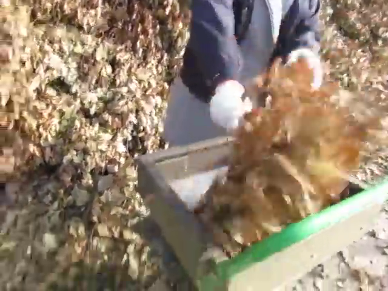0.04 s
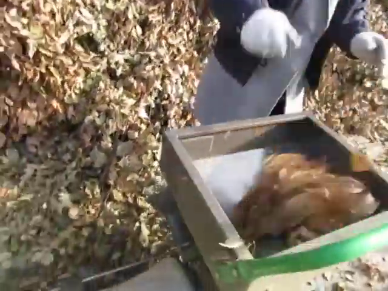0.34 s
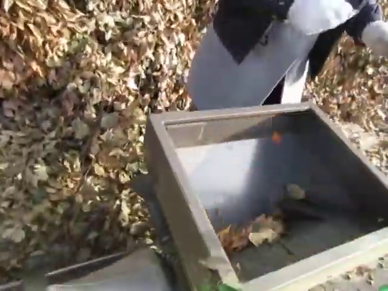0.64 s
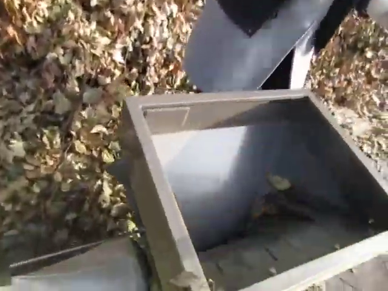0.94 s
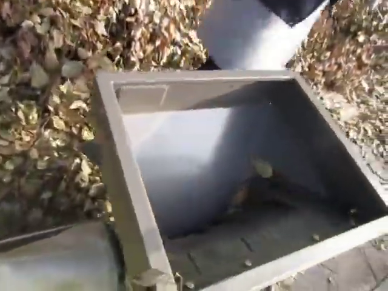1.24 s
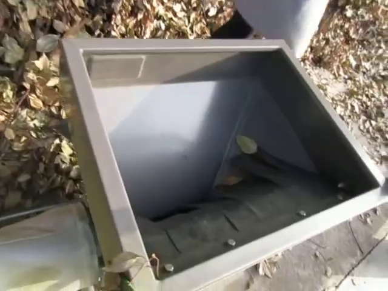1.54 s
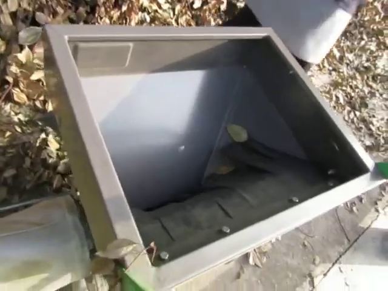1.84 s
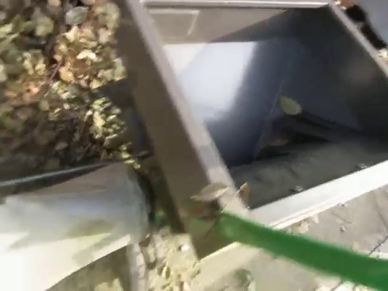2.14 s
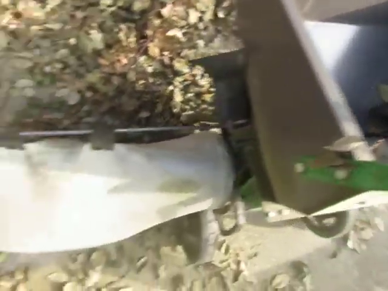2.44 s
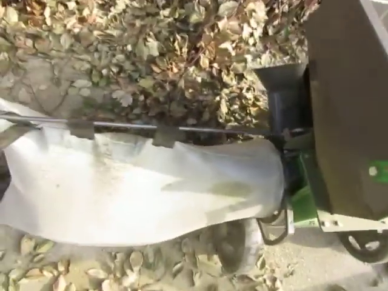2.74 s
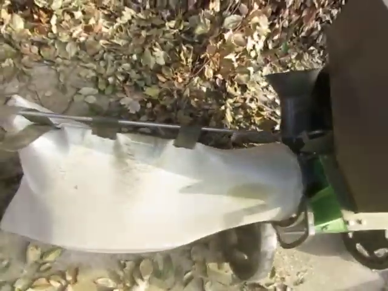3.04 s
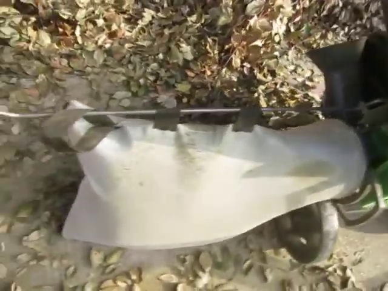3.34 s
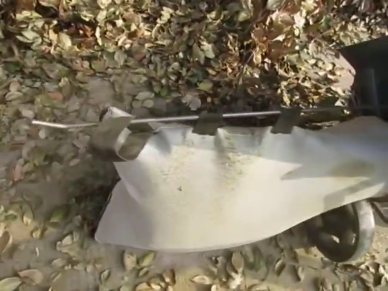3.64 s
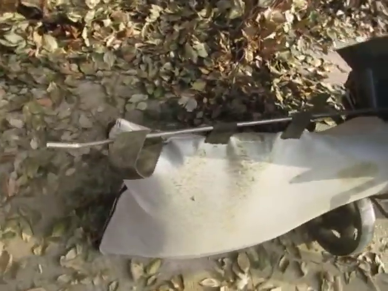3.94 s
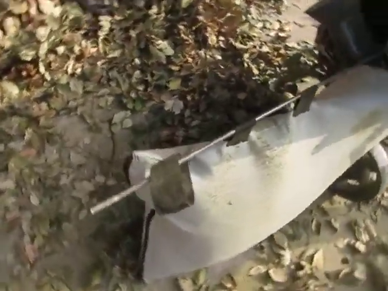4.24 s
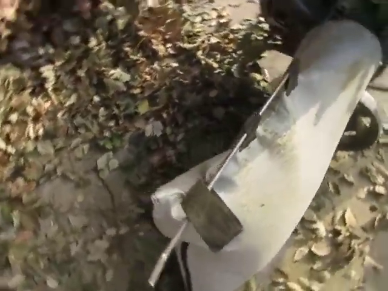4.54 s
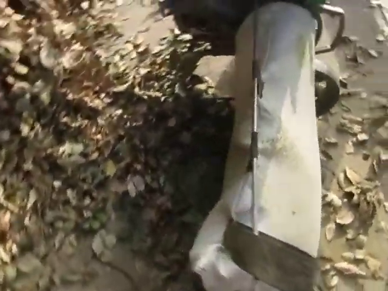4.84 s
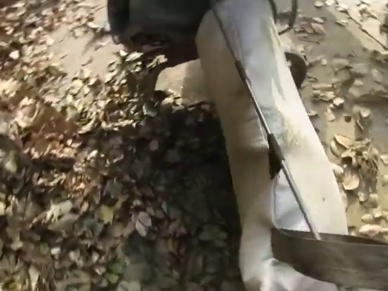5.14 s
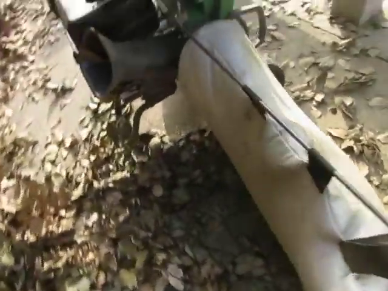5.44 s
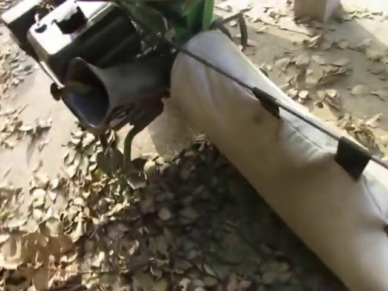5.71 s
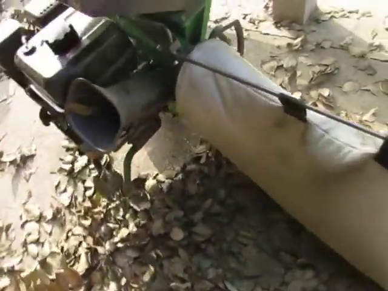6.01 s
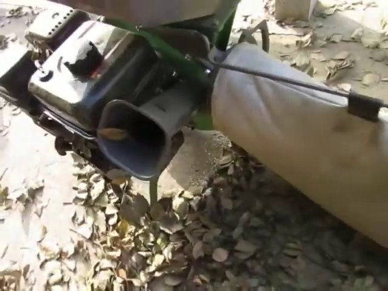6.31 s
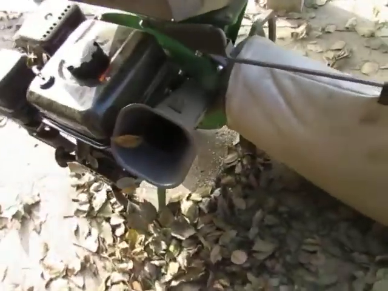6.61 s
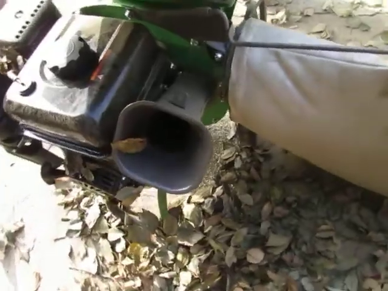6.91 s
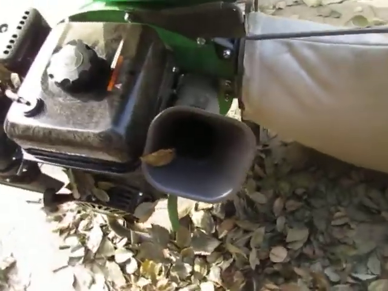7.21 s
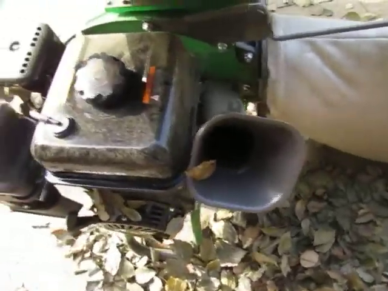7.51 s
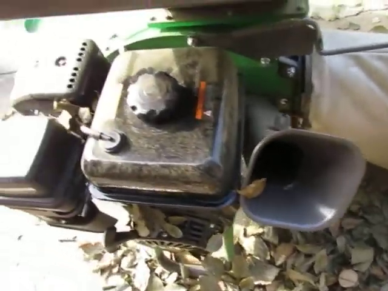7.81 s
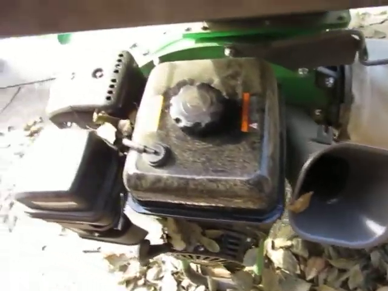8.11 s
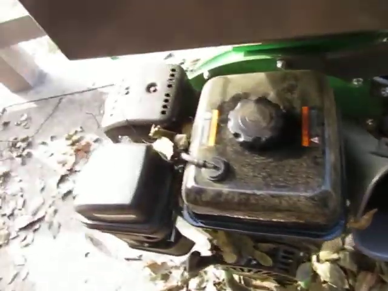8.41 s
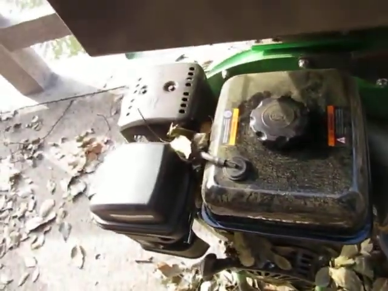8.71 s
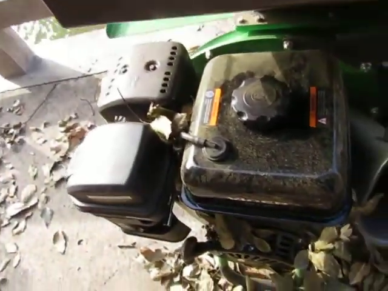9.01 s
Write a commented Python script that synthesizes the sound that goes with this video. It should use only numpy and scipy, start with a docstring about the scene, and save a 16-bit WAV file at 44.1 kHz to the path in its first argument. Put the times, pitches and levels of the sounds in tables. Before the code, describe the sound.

A petrol chipper shredder runs outdoors throughout, heard close up as a strong, steady drone over a throbbing exhaust and a low rush of air. From the start, dry leaves crunch loudly in the rotor and chips hiss into a cloth bag. The engine sags slightly in pitch until about 0.9 seconds and recovers by 1.5 seconds. Stalks ping against the ringing steel hopper during the first three seconds. The crunching eases after one second and keeps fading, with short hissing spurts of chips between two and six seconds, by which time the leaves have almost run out. As the microphone moves along the machine, the drone wavers in strength and its higher overtones come forward. The engine's metallic clatter recedes around three seconds, returns near five and is stronger from seven seconds until the end, at about nine seconds.

```python
"""Dry leaves crunch over the drone of a single-cylinder petrol chipper shredder running outdoors.
The armful sags the engine until the governor catches it; the rotor shatters the leaves, flings
them against the steel hopper and blows the chips hissing into a cloth bag. As the hopper empties
the microphone moves along the bag to the engine, so the rotor's overtones shift and the clatter grows."""
import sys
import numpy as np
from scipy import signal
from scipy.fft import rfft, irfft, next_fast_len
from scipy.io import wavfile
from scipy.ndimage import map_coordinates

SR = 44100
rng = np.random.default_rng(int(sys.argv[2]) if len(sys.argv) > 2 else 0)


def transcribe(u):
    """Save the signal u as a 16-bit wav file named by the first command-line argument.

    u: samples, shape (n,) or (channels, n), limited to [-1, 1]; the rate is SR.
    q: integer samples, one column per channel.
    """
    v = np.clip(np.atleast_2d(u).T, -1, 1)
    q = np.round(v * 32767).astype(np.int16)
    wavfile.write(sys.argv[1], SR, q)


N = 403956
TIME = np.arange(N) / SR

# the load drags the crankshaft down and the governor catches it: time_s, turns_per_s
CRANK_SPEED = [(0, 58.3), (0.25, 57.2), (0.68, 56.0), (0.88, 56.07), (1.1, 57.37), (1.4, 58.45),
               (2.25, 58.7), (3.2, 59.5), (4.2, 59.48), (6.4, 59.78), (7.1, 59.55), (9.16, 59.54)]


def amp(db):
    """Decibels to gain."""
    return 10 ** (np.asarray(db) / 20)


def unit(x):
    """Scaled to rms 1."""
    return x / np.sqrt(np.mean(x ** 2) + 1e-20)


def curve(rows):
    """An automation curve through rows of time and value."""
    return np.interp(TIME, *np.transpose(rows))


def after(start_s):
    """Seconds since a moment, zero before it."""
    return np.maximum(TIME - start_s, 0)


def colour(x, spectrum):
    """Minimum-phase EQ through rows of frequency and gain."""
    hz, db = np.transpose(spectrum)
    size = next_fast_len(N + 8192)
    log_hz = np.log(abs(np.fft.fftfreq(size, 1 / SR)) + 1)
    log_gain = np.log(amp(np.interp(log_hz, np.log(hz), db)))
    response = np.exp(np.conj(signal.hilbert(log_gain)))[:size // 2 + 1]
    return irfft(rfft(x, size) * response, size)[:N]


def wander(rate_hz):
    """Smooth random drift of rms 1."""
    hz = np.fft.rfftfreq(N, 1 / SR)
    return unit(irfft(rfft(rng.standard_normal(N)) * np.exp(-(hz / rate_hz) ** 2), N))


def spread(mid, side):
    """Mid and side to stereo: the microphone's two ports agree in the bass and part in the treble."""
    # stereo width: frequency_hz, side_gain_db
    width = [(60, -14), (200, -11.5), (600, -7.5), (1200, -13.5), (2500, -13), (5000, -9), (9000, -7),
             (13000, -5)]
    side = colour(side, width)
    return np.array([mid + side, mid - side])


def grains(per_s, size_db):
    """Dense tiny fractures of uneven size."""
    sizes = amp(size_db * np.minimum(rng.exponential(1, N), 4))
    return unit(rng.choice([-1, 1], N) * sizes * (rng.random(N) < per_s / SR))


def shower(level, spectrum, per_s, size_db):
    """Grains of one colour under a level curve, in stereo."""
    mid, side = (unit(colour(grains(per_s, size_db), spectrum)) for _ in range(2))
    return level * spread(mid, side)


def burst(start_s, decay_s, rise_s):
    """A quick swell that dies away."""
    age = np.clip(TIME - start_s, 0, 1)
    return (1 - np.exp(-age / rise_s)) * np.exp(-age / decay_s)


def snaps(per_s, decay_s):
    """Small clumps break at random: sudden rises that fade, mean 1."""
    starts = (rng.random(N) < per_s / SR) * rng.uniform(0.65, 1, N)
    swell = signal.lfilter([1], [1, -np.exp(-1 / (decay_s * SR))], starts)
    return swell / swell.mean()


def feed(full_db, step_db, fade_db_per_s, thin_s, run_out_db, armful_end_s=0.89, run_out_s=2.74):
    """Flow of leaves: steady while the armful lasts, a step and a lull, a slow fade, then running out."""
    since = after(armful_end_s)
    step = step_db * (1 - np.exp(-since / 0.049))
    lull = -4.5 * np.exp(-((TIME - 1) / 0.067) ** 2)
    run_out = run_out_db * (1 - np.exp(-after(thin_s) / run_out_s))
    return amp(full_db + step + lull - fade_db_per_s * since + run_out)


def leaves(clump_depth=0.27, chip_depth=0.22):
    """Leaves shatter in clumps; their chips hiss down the chute until the hopper runs empty."""
    # leaves shattering in the rotor: frequency_hz, gain_db
    crunch_spectrum = [(100, -20), (180, 12.5), (330, 2), (600, -12.5), (900, -3), (1250, -2), (1550, 3.5),
                       (1950, 3.5), (2500, 5), (3300, 1), (5000, -4), (8000, -11.5), (15000, -39)]
    # chips hissing into the bag: frequency_hz, gain_db
    chip_spectrum = [(1500, -18), (3000, 5), (4800, 5), (7000, 6), (9000, 5.5), (11500, 6), (13000, 3.5),
                     (14200, -1.5), (15200, -23)]
    # the blades bite a clump: start_s, relative_db
    blade_bites = [(0.075, -27), (0.113, -15), (0.261, -12), (0.415, -16), (0.475, -10.5), (0.609, -17),
                   (0.665, -13), (0.8, -15), (1.0, -13), (1.155, -19), (1.47, -18), (1.55, -25),
                   (1.757, -20), (2.269, -21), (2.714, -26), (2.83, -27), (3.538, -17.5)]
    # a spurt of chips hits the bag: start_s, level_db, decay_s
    chip_sprays = [(2.065, -24, 0.022), (2.403, -23.5, 0.042), (2.797, -25, 0.02), (2.849, -28, 0.013),
                   (3.329, -28, 0.032), (3.546, -28, .018), (3.589, -32, 0.031), (3.945, -29, 0.017),
                   (4.048, -29.5, 0.022), (4.09, -35, 0.013), (4.195, -31, .01), (4.355, -37, 0.0074),
                   (4.528, -24, 0.0092), (4.69, -33, 0.02), (4.819, -24, 0.016), (5.097, -32, 0.028),
                   (6.056, -30, .025)]
    # one clump both crunches and sends a puff of chips down the chute
    clumps = snaps(per_s=46, decay_s=0.014)
    load = feed(full_db=-20.5, step_db=-3.5, fade_db_per_s=4.0, thin_s=4.2, run_out_db=-32)
    load = load * (1 + clump_depth * (clumps - 1))
    chips = feed(full_db=-25.5, step_db=0.5, fade_db_per_s=1.45, thin_s=2.98, run_out_db=-16)
    chips = chips * (1 + chip_depth * (clumps / 2 + snaps(per_s=210, decay_s=0.0051) - 3 / 2))
    bites = sum(amp(db) * burst(s, decay_s=0.028, rise_s=0.005) for s, db in blade_bites)
    sprays = sum(amp(db) * burst(s, decay_s, rise_s=0.0018) for s, db, decay_s in chip_sprays)
    crunching = shower(load + amp(-9) * bites, crunch_spectrum, per_s=8000, size_db=1)
    ringing = hopper(amp(-5) * load + amp(-7) * bites)
    hissing = shower(chips + amp(-21) * bites + sprays, chip_spectrum, per_s=16000, size_db=1.5)
    return crunching + ringing + hissing


def hopper(level, stalk_hz=1780, stalk_width_hz=330):
    """Flung leaves keep the steel walls ringing; a supple stalk sets off only the main modes."""
    # modes of the sheet steel: pitch_hz, width_hz, relative_db
    steel_modes = [(1370, 47, -8), (1676, 31, -4), (1812, 80, 2), (2155, 100, 2.5), (2300, 120, 1),
                   (2500, 200, -13), (3410, 150, -4), (5220, 130, -5)]
    # a stalk whips the wall: start_s, peak_db
    stalk_hits = [(.374, -11), (.49, -11), (.812, -13), (1.004, -15), (1.165, -8), (1.488, -11),
                  (1.857, -14), (1.889, -8), (2.068, -16), (2.098, -10), (2.83, -19)]
    t = np.arange(SR // 10) / SR
    modes = np.array([amp(db) * np.sqrt(width) * np.exp(-np.pi * width * t) * np.sin(2 * np.pi * hz * t)
                      for hz, width, db in steel_modes])
    ring = modes.sum(0) / np.linalg.norm(modes.sum(0))
    ping = np.exp(-((np.array(steel_modes)[:, 0] - stalk_hz) / stalk_width_hz) ** 2) @ modes
    mid, side = (signal.oaconvolve(level * grains(per_s=3500, size_db=2), ring)[:N] for _ in range(2))
    for start_s, db in stalk_hits:
        mid[round(start_s * SR):][:len(ping)] += amp(db) * ping / abs(ping).max()
    return spread(mid, side)


def engine_cycles(jitter=0.000962, surge=0.0013, drop_at_s=1.4233, drop_s=0.0021):
    """Count of four-stroke cycles, two turns each; the crank surges after each firing, then coasts."""
    rate = curve(CRANK_SPEED) / 2 * (1 + jitter * wander(22.8))
    cycles = np.cumsum(rate) / SR
    # the recorder drops about 2 ms of samples, so every tone jumps in phase with a dull click
    cycles = cycles - cycles[round(drop_at_s * SR)] + drop_s * rate * (TIME > drop_at_s)
    return cycles + surge * np.sin(2 * np.pi * cycles)


def strain(lag_s=0, free_turns_per_s=59.6, full_sag_turns_per_s=3.6):
    """How hard the engine labours, 0 running free to 1 at full throttle."""
    speed = np.interp(TIME - lag_s, *np.transpose(CRANK_SPEED))
    return np.clip((free_turns_per_s - speed) / full_sag_turns_per_s, 0, 1) ** 2


def tone(cycles, db):
    """A sine of the given rms level that follows a count of cycles."""
    return np.sqrt(2) * amp(db) * np.sin(2 * np.pi * (cycles + rng.random()))


def walk_by(all_round_db, beam_db, facing_s, half_width_s, echo_share, dip_s, dip_spacing_s):
    """Gain of one overtone along the microphone's path: a beam, rippled by an echo."""
    beam = amp(all_round_db) + amp(beam_db) * np.exp(-((TIME - facing_s) / half_width_s) ** 2)
    return beam * abs(1 - echo_share * np.exp(2j * np.pi * (TIME - dip_s) / dip_spacing_s))


def rotor(cycles, drone_trim_db=-0.4, overtone_trim_db=0.05, load_boost_db=3.5):
    """Four blades passing the outlet: a strong drone with fluttering overtones that grow under load."""
    # swell of the drone: time_s, level_db
    drone_level = [(0, -18.5), (0.66, -23), (1.04, -16.5), (1.45, -13), (2.11, -14.5), (2.98, -19),
                   (3.67, -15), (4.26, -17.5), (4.82, -15), (5.71, -16.5), (6.73, -13.5), (7.22, -16),
                   (8.05, -14.5), (9.16, -15.5)]
    # where the drone sits: time_s, left_minus_right_db
    drone_pan = [(0, 3), (1.2, 2), (3, 2.5), (4.5, 0.5), (7.2, 0.7), (9.16, -0.5)]
    # overtones, each beamed one way:
    # crank_multiple, all_round_db, beam_db, facing_s, half_width_s, echo_share, dip_s, dip_spacing_s
    beams = [(6, -40.5, -49, 2.2, 0.46, 0.5, 4.15, 5.5), (8, -36, -28, 4.01, 1.45, 0.17, 1.89, 1.93),
             (10, -44.5, -51, 1.8, .9, 0.67, 4.5, 4.3), (12, -39, -27.5, 6.81, 1.7, 0.29, 0.66, 1.796),
             (14, -42, -34, 6.3, 1.43, 1, 0.62, 6.5), (16, -38.5, -37, 5.5, 3.4, 0.4, .22, 1.824),
             (20, -76, -37, 8.4, 1.3, .17, 1.4, 1.4), (24, -58, -36.5, 8.8, 4.2, 0.3, 0.02, 3.13),
             (28, -58, -43.5, 4.15, 2.3, 0.23, .6, 2.7)]
    drone = np.sqrt(2) * amp(curve(drone_level) + drone_trim_db) * np.sin(2 * np.pi * 8 * cycles)
    drone = drone * (1 + 0.11 * wander(52))  # flutter
    pan_db = curve(drone_pan) / 2
    overtones = sum(tone(2 * order * cycles, overtone_trim_db) * walk_by(*path) * (1 + 0.063 * wander(39))
                    for order, *path in beams)
    return drone * amp([pan_db, -pan_db]) + overtones * amp(load_boost_db * strain())


def exhaust(cycles, unevenness=0.075, throttle_db=5):
    """Firings through the silencer: high harmonics carry less far; an open throttle deepens the throb."""
    # the exhaust note: firing_multiple, relative_db
    harmonics = [(1, -60), (2, -38.5), (3, -46), (4, -29), (5, -34.5), (6, -33.5), (7, -30), (9, -33),
                 (10, -36), (11, -40), (13, -34), (14, -29.5), (18, -32.5)]
    # its swell, scaled for each harmonic below: time_s, swell_db
    swell = [(0, -10.5), (1, -5.5), (2, -6), (3, -4.5), (7, -1), (9.16, -0.4)]
    swell_db = curve(swell)
    throb_db = throttle_db * strain(lag_s=0.42)
    note = 0
    for order, db in harmonics:
        level_db = db + swell_db * (0.094 + 0.17 * order) + throb_db * np.exp(-order / 4.5)
        note += tone(order * cycles, level_db)
    return note * (1 + unevenness * wander(9.7)) * amp([[0.3], [-0.3]])


def clatter(cycles, ring_db=3.5, rattle_db=6.0, decay_cycles=0.061, floor=0.56, uneven_db=0.6):
    """Knocks ring the casing alike in every cycle and shake loose metal at random."""
    # firing, valve and piston knocks: cycle_fraction, relative_db
    cycle_knocks = [(.03, -28.5), (.27, -24), (.55, -5.5), (.78, -27)]
    # the ringing casing: frequency_hz, gain_db
    ring_spectrum = [(250, -28), (420, -33), (600, 0), (850, 3), (1100, 2.5), (1600, 1), (2300, -3),
                     (3500, -11.5), (6000, -32.5), (15000, -46)]
    # loose metal: frequency_hz, gain_db
    rattle_spectrum = [(200, -10), (350, -9.5), (520, -2), (650, -6.5), (880, 0.5), (1300, -6), (2300, -7),
                       (3200, -12), (5000, -18), (7000, -23.5), (10000, -28.5), (13000, -29.5),
                       (15000, -50)]
    # nearness of the engine: time_s, gain_db
    nearness = [(0, -31), (2.6, -40), (4.1, -38.5), (4.7, -33.5), (5.6, -34.5), (7, -31), (9.16, -32)]
    place = cycles % 1
    knocks = floor + sum(amp(db) * np.exp(-((place - at) % 1) / decay_cycles) for at, db in cycle_knocks)
    # the same contacts recur in every cycle, which makes a comb of fine lines
    grid = np.linspace(0, 1, 1500)
    contacts = [np.interp(place, grid, rng.standard_normal(len(grid))) for _ in range(2)]
    ring = [unit(colour(knocks * pattern, ring_spectrum)) for pattern in contacts]
    knocks = knocks * amp(uneven_db * wander(45))
    rattle = [unit(colour(knocks * rng.standard_normal(N), rattle_spectrum)) for _ in range(2)]
    mid, side = amp(ring_db) * np.array(ring) + amp(rattle_db) * np.array(rattle)
    return spread(mid, side) * amp(curve(nearness))


def churning_air():
    """Turbulence in the rotor housing, stronger while it is full of leaves."""
    # the low rush of air: frequency_hz, gain_db
    churn_spectrum = [(10, -52), (35, -25), (60, -6), (95, -8.5), (150, 4), (230, -5), (330, -6.5),
                      (480, -4), (650, -9), (800, -2.5), (920, -8.5), (1200, -13.5), (4000, -40.5)]
    level_db = curve([(0, -30), (1.1, -27.5), (2, -29.5), (3.5, -30.5), (6, -34), (9.16, -33.5)])
    mid, side = (unit(colour(rng.standard_normal(N), churn_spectrum)) for _ in range(2))
    return amp(level_db) * spread(mid, side)


def microphone_turn(mix, lag_samples=1.0, phase_rad=0.26, shade_db=4.0):
    """A source to the right reaches the left port later, and shaded in the mids."""
    # direction of the machine: time_s, bearing (0 ahead, 1 well to the right)
    bearings = [(0, 0.46), (1.8, 0.38), (2.7, 1), (4.2, 0.99), (5.3, -0.065), (7.2, -0.06), (8.2, 0.6),
                (9.16, 0.67)]
    toward_port = curve(bearings) * np.array([[-0.5], [0.5]])
    mids = signal.sosfiltfilt(signal.butter(1, [450, 6000], "bandpass", fs=SR, output="sos"), mix)
    mix = mix + mids * (amp(shade_db * toward_port) - 1)
    mix = (signal.hilbert(mix) * np.exp(1j * phase_rad * toward_port)).real
    read_at = np.arange(N) + lag_samples * toward_port
    return np.array([map_coordinates(port, [at], order=5, mode="nearest")
                     for port, at in zip(mix, read_at)])


def scene():
    """Engine and rotor share one shaft; the whole machine swings with the microphone's aim."""
    cycles = engine_cycles()
    return microphone_turn(rotor(cycles) + exhaust(cycles) + clatter(cycles) + churning_air() + leaves())


def record(dry, ceiling=0.76, cutoff_hz=15200):
    """Two narrow notches, a soft ceiling on the sharpest cracks, then a steep low-pass."""
    # notches in the treble: centre_hz, width_hz
    notches = [(3965, 356), (7935, 260)]
    for hz, width in notches:
        dry = signal.lfilter(*signal.iirnotch(hz, hz / width, fs=SR), dry)
    limited = dry / (1 + (dry / ceiling) ** 8) ** (1 / 8)
    low_pass = signal.firwin(511, cutoff_hz, window=("kaiser", 9), fs=SR)
    return signal.oaconvolve(limited, low_pass[None], "same")


dry = scene()
out = record(dry)
transcribe(out)
```